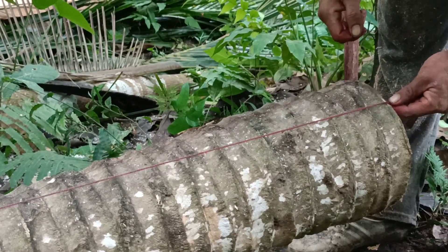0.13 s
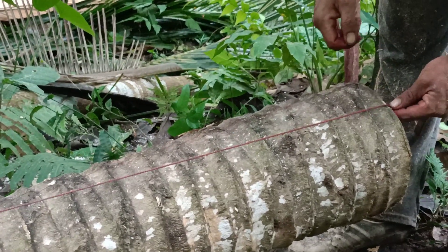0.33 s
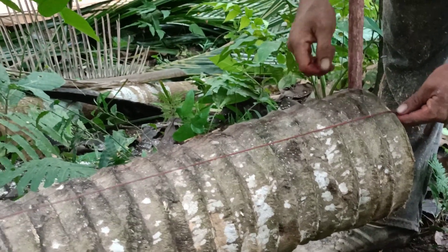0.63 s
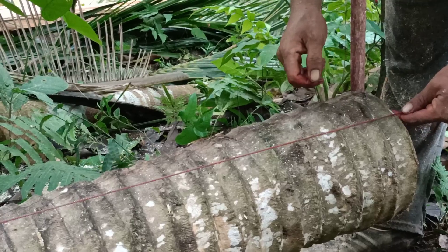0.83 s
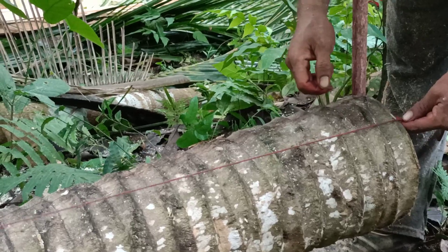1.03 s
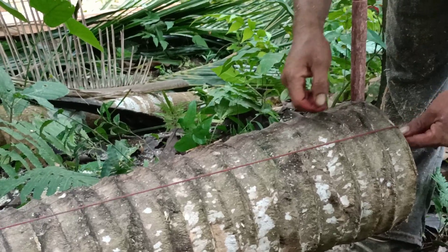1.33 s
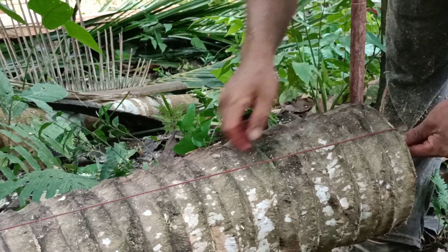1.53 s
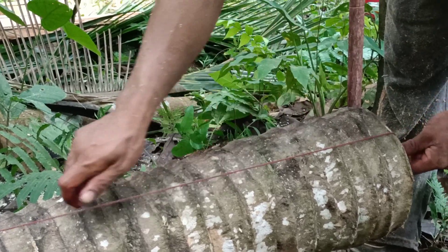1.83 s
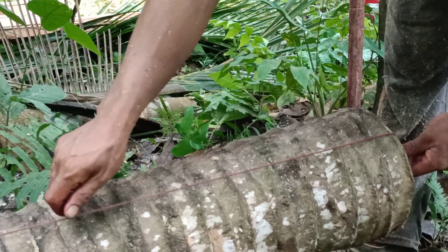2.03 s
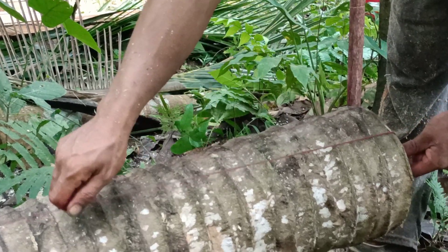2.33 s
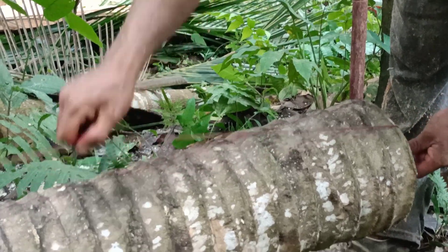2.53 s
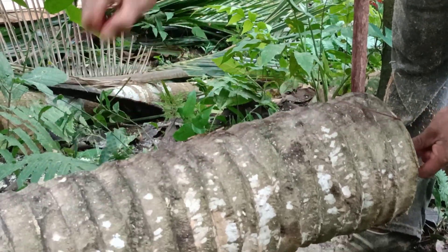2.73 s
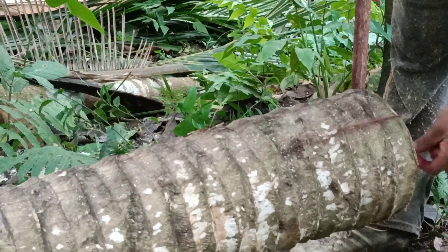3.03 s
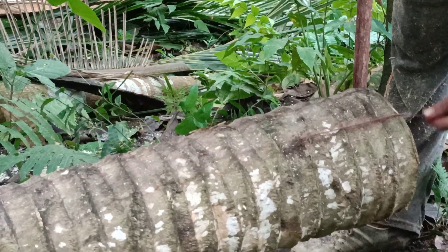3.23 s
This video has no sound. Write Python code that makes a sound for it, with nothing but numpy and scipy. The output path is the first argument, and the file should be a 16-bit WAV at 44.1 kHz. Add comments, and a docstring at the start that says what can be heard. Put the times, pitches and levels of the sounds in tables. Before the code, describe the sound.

A taut string snaps hard against a palm log near the microphone after three seconds of faint sleeve rustle and gritty scuffs; the crack scatters in foliage while the line bounces duller, over quiet outdoor air.

```python
"""Outdoors among plants, a chalk line is lifted and snapped once against a palm log, near the microphone.
A quiet rumble and two-banded hiss run throughout, shaped from noise; sleeve rustle, gritty scuffs and a soft
low bump come first, as swelling noise and grains. The string slips from the fingers with a squeak and slaps the
bark in dense rushes of tiny contacts; decaying sines make its hum, its ringing and the low push on the log.
It bounces back a few times, ever duller, while noise tails scatter the sound as foliage does."""
import sys
import numpy as np
from scipy import signal
from scipy.fft import rfft, irfft
from scipy.io import wavfile
from scipy.ndimage import uniform_filter1d

SR = 44100
rng = np.random.default_rng(int(sys.argv[2]) if len(sys.argv) > 2 else 0)


def pcm_store(signal):
    """Save signal as 16-bit PCM."""
    levels = np.round(np.clip(np.atleast_2d(signal), -1, 1) * 32767)
    wavfile.write(sys.argv[1], SR, levels.astype(np.int16).T)


N = 149940  # samples, 3.4 s


def amp(db):
    """Decibels to gain."""
    return 10 ** (np.asarray(db) / 20)


def unit(x):
    """Scales to rms 1."""
    return x / np.sqrt(np.mean(x ** 2) + 1e-20)


def read(points, hz):
    """Reads a table on a log-frequency axis."""
    f, value = np.transpose(points)
    return np.interp(np.log(hz + 1), np.log(f + 1), value)


def bins():
    """Frequencies of the full-length spectrum, in Hz."""
    return np.fft.rfftfreq(N, 1 / SR)


def since(start):
    """Seconds since start, zero before it."""
    return np.maximum(np.arange(N) / SR - start, 0)


def burst(start, rise, decay):
    """Linear rise, then exponential decay."""
    t = since(start)
    return np.minimum(t / rise, 1) * np.exp(-np.maximum(t - rise, 0) / decay)


def hill(hz, octaves):
    """A bell curve over log frequency."""
    return np.exp(-.5 * (np.log2((bins() + 1) / hz) / octaves) ** 2)


def colour(x, db):
    """Causal filter of unit power; the dB per bin set only its shape."""
    # Folding the cepstrum forward in time gives minimum phase
    cepstrum = irfft(np.log(unit(amp(db)) + 1e-6), N)
    cepstrum[1:N // 2] *= 2
    cepstrum[N // 2 + 1:] = 0
    return irfft(rfft(x) * np.exp(rfft(cepstrum)), N)


def pair(x, likeness):
    """Blends two unrelated channels to a given likeness per frequency."""
    angle = np.arcsin(np.clip(read(likeness, bins()), -1, 1)) / 2
    z = rfft(x)
    return irfft(np.cos(angle) * z + np.sin(angle) * z[::-1], N)


def grains(per_s, spread_db):
    """Dense tiny contacts, uneven when spread_db is above 0, in two channels of rms 1."""
    size = amp(spread_db * np.minimum(rng.exponential(1, (2, N)), 3))
    sign = rng.choice([-1, 1], (2, N))
    present = rng.random((2, N)) < per_s / SR
    return unit(size * sign * present)


def waver(rate_hz):
    """A slow random wobble of rms 1."""
    spectrum = rfft(rng.standard_normal(N)) * np.exp(-(bins() / rate_hz) ** 2)
    return unit(irfft(spectrum, N))


# Colour of the outdoor air: (frequency [Hz], relative level [dB per Hz])
AIR_COLOUR = [(12, -39), (20, -15.5), (59, -2.5), (97, -7.5), (175, -8.5), (237, -16.5), (280, -13),
              (322, -21), (425, -17.5), (627, -21.5), (681, -25.5), (1400, -33), (2970, -29.5), (6290, -34),
              (7850, -20.5), (8780, -35.5), (10700, -20), (12300, -39), (15300, -34.5)]
# How alike left and right are in the air and the cloth: (frequency [Hz], likeness [0-1])
AIR_LIKENESS = [(30, 0.27), (90, 0.76), (250, 0.85), (700, 0.35), (2000, 0.1), (10000, 0.051)]
AIR_DB, AIR_PATCHY_DB = -61, 1.27  # overall level, rms unevenness


def air():
    """Low outdoor rumble and a thin hiss with two high bands, gently patchy in time and frequency."""
    noise = pair(rng.standard_normal((2, N)), AIR_LIKENESS)
    z = signal.stft(noise, nperseg=1024)[2]
    patches = uniform_filter1d(rng.standard_normal(z.shape[1:]), size=14, axis=0)
    patches = unit(uniform_filter1d(patches, size=8, axis=1))
    patchy = signal.istft(z * amp(AIR_PATCHY_DB * patches), nperseg=1024)[1][:, :N]
    return amp(AIR_DB) * unit(colour(patchy, read(AIR_COLOUR, bins())))


# Sleeve and arm moving: (middle [s], half length to 1/e [s], level [dB])
SLEEVE_SWISHES = [(0.326, 0.23, -64), (.68, 0.042, -67), (1.522, .17, -64.5), (1.848, 0.2, -66),
                  (2.513, 0.18, -72.5)]
# Colour of the cloth: (frequency [Hz], relative level [dB])
CLOTH_COLOUR = [(60, -31), (180, -3.5), (300, 5.5), (600, -4.5), (1100, -12.5), (2500, -20), (12000, -24)]


def movement():
    """Cloth swishes as the arm reaches out: coloured noise in bell-shaped swells."""
    t = since(0)
    noise = pair(rng.standard_normal((2, N)), AIR_LIKENESS)
    speed = sum(amp(db) * np.exp(-((t - s) / half) ** 2) for s, half, db in SLEEVE_SWISHES)
    return speed * colour(noise, read(CLOTH_COLOUR, bins()))


# Fingers and line scuffing the bark:
# (start [s], level [dB], rise [s], decay [s], brightest frequency [Hz], its lift [dB])
BARK_SCUFFS = [(0.526, -58.5, 0.013, 0.05, 3280, 4), (.652, -55.5, 0.015, 0.011, 5170, 14),
               (0.683, -54, .003, 0.011, 5400, 6), (0.6971, -45.5, 0.00073, 0.0034, 5570, 9.5),
               (0.9, -57, 0.008, 0.018, 5830, 3), (.931, -64.5, .003, 0.018, 6000, 5),
               (.99, -58.5, .007, 0.026, 9400, 8), (1.714, -55.5, 0.0022, .008, 5340, 11),
               (1.805, -63.5, .005, 0.021, 6000, 9), (1.846, -65, 0.0036, 0.0099, 4600, 15),
               (2.54, -68, 0.02, 0.065, 4080, 7)]
# Shared colour of the scuffs: (frequency [Hz], relative level [dB])
SCUFF_TINT = [(100, -1), (600, -1), (1400, -7), (3000, 1), (11000, 0.5), (15000, -6)]
# How alike left and right are for sounds near the microphone: (frequency [Hz], likeness [0-1])
NEAR_LIKENESS = [(100, 0.6), (1200, 0.33), (2600, 0), (8000, 0.24)]
SCUFF_GRAINS_PER_S, SCUFF_SPREAD_DB, SCUFF_OCTAVES = 3000, 3.5, 0.19


def scuffs():
    """Small gritty rubs of fingers and line: grains with a bright band of their own for each rub."""
    grit = pair(grains(SCUFF_GRAINS_PER_S, SCUFF_SPREAD_DB), NEAR_LIKENESS)
    out = np.zeros((2, N))
    for s, db, rise, decay, hz, lift_db in BARK_SCUFFS:
        rub = grit * amp(db) * burst(s, rise, decay)
        out += colour(rub, read(SCUFF_TINT, bins()) + lift_db * hill(hz, SCUFF_OCTAVES))
    return out


# Early scatter, how fast each band dies: (frequency [Hz], t60 [s])
EARLY_DECAY = [(300, 0.47), (1200, 0.4), (3000, .23), (5000, 0.26), (9000, .27), (15000, 0.23)]
EARLY_DB = -6.5
# Late scatter, how fast each band dies: (frequency [Hz], t60 [s])
LATE_DECAY = [(300, .9), (4000, 0.94), (15000, 0.65)]
# Late scatter, gain of each band: (frequency [Hz], gain [dB])
LATE_TINT = [(300, -25), (1500, -20), (3000, -29.5), (5500, -18.5), (14000, -30)]


def scatter(t60, tint=None, onset_s=0.0093):
    """A diffuse one-second tail, each band dying at its own speed; unit energy before any tint."""
    hz, t, z = signal.stft(rng.standard_normal((2, SR)), SR, nperseg=256)
    fading = z * amp(-60 * t / read(t60, hz)[:, None])
    tail = signal.istft(fading, SR, nperseg=256)[1][:, :SR]
    tail = tail * np.minimum(np.arange(SR) / SR / onset_s, 1)
    tail = unit(tail) / np.sqrt(SR)
    if tint is None:
        return tail
    gain = amp(read(tint, np.fft.rfftfreq(SR, 1 / SR)))
    return irfft(rfft(tail) * gain, SR)


def grove(x):
    """Undergrowth scatters the sound; farther trees add a faint longer tail."""
    response = amp(EARLY_DB) * scatter(EARLY_DECAY) + scatter(LATE_DECAY, LATE_TINT)
    return signal.fftconvolve(x, response, axes=1)[:, :N]


BUMP_START_S, BUMP_LENGTH_S = .895, .1
BUMP_DB, BUMP_HZ, BUMP_OCTAVES = -55, 83, 0.36


def bump():
    """One soft swell of low narrow noise, perhaps a shift of weight on the ground."""
    low = unit(irfft(rfft(rng.standard_normal(N)) * hill(BUMP_HZ, BUMP_OCTAVES), N))
    progress = np.minimum(since(BUMP_START_S) / BUMP_LENGTH_S, 1)
    swell = np.sqrt(abs(np.sin(np.pi * progress)))
    return amp(BUMP_DB) * swell * low


# String meeting the bark: (start [s], level [dB], rise [s], decay [s])
BARK_SLAPS = [(2.9848, -31.5, 0.0039, 0.0053), (2.9941, -13.5, 0.00018, 0.0014),
              (2.9956, -8, 0.0028, 0.0034), (3.0042, -13, 0.0012, 0.0046), (3.0075, -13, 0.00042, 0.0093),
              (3.0163, -17.5, 0.0014, 0.0084)]
# Colour of the crack: (frequency [Hz], relative level [dB])
CRACK_COLOUR = [(60, -20.5), (300, -25), (550, -11.5), (850, -22), (1170, -17), (1700, -16.5),
                (2300, -13.5), (2870, -5), (3800, -10.5), (4500, -6), (7000, -3), (9000, 0.5), (12000, -5),
                (15300, -8)]
CONTACTS_PER_S, CONTACT_SPREAD_DB = 20000, 0


def crack():
    """The string lands on the rough bark in a few quick rushes of contacts, their powers added."""
    power = sum((amp(db) * burst(s, rise, decay)) ** 2 for s, db, rise, decay in BARK_SLAPS)
    contacts = pair(grains(CONTACTS_PER_S, CONTACT_SPREAD_DB), NEAR_LIKENESS)
    return colour(np.sqrt(power) * contacts, read(CRACK_COLOUR, bins()))


ZIP_S, ZIP_DB, ZIP_RISE_S, ZIP_DECAY_S, ZIP_HZ, ZIP_OCTAVES = 2.987, -26.5, .012, .004, 2880, 0.13


def slip():
    """A brief narrow squeak of the cord over the skin as it slips from the fingertips."""
    contacts = pair(grains(CONTACTS_PER_S, CONTACT_SPREAD_DB), NEAR_LIKENESS)
    narrow_db = 20 * np.log10(hill(ZIP_HZ, ZIP_OCTAVES) + 0.0093)  # a faint floor outside the band
    rub = colour(contacts, narrow_db)
    return amp(ZIP_DB) * burst(ZIP_S, ZIP_RISE_S, ZIP_DECAY_S) * rub


# Close reflections from the log and the ground: (delay [s], left gain [ratio], right gain [ratio])
NEAR_REFLECTIONS = [(.0023, 0.16, -0.23), (.0051, -0.23, 0.3), (.0098, .3, .2)]


def reflections(x):
    """The log and the ground return a few close copies."""
    out = np.zeros((2, N))
    for delay, left, right in NEAR_REFLECTIONS:
        out += np.array([[left], [right]]) * np.roll(x, round(delay * SR), axis=1)
    return out


# Partials of the taut string: (frequency [Hz], level above HUM_DB [dB], t60 before slackening [s])
STRING_PARTIALS = [(301, -7, 1), (378, -10, 1), (402, -11, 1), (499.6, -3, 1), (604, -2.5, 0.37),
                   (700, -11, .3)]
# Ringing of the line and its anchor: (frequency [Hz], level [dB] before each blow's own, t60 [s])
ANCHOR_MODES = [(1144, -42, .17), (1179, -40, .12), (1272, -38, .13), (2040, -50.5, 0.15), (2929, -42, .11)]
# Each swing sets the line ringing again: (start [s], level added to the modes [dB], rise [s])
SWING_BLOWS = [(2.989, 2, 0.0038), (3.024, 8.5, 0.018), (3.058, -0.5, 0.014), (3.126, -9, .015),
               (3.176, -21, .01), (3.247, -15, 0.011), (3.32, -20, 0.015)]
RELEASE_S, HUM_RISE_S, HUM_DB = 2.989, 0.0075, -43.5
WAVER_SHARE, WAVER_HZ = .006, 22  # rms share of pitch, speed of the wobble
SLACK_AFTER_S, SLACK_FADE_S = .17, 0.093  # counted from release, then 1/e fade


def ring(start, rise, hz, db, t60, clock):
    """One dying mode, with its own phase on each side; the clock carries its wavering."""
    first = round(start * SR)
    t = np.arange(N - first) / SR
    phase = rng.random() + rng.random((2, 1)) / 2
    level = np.minimum(t / rise, 1) * amp(db - 60 * t / t60)
    tone = level * np.sin(2 * np.pi * (hz * clock[first:] + phase))
    return np.pad(tone, ((0, 0), (first, 0)))


def string():
    """The taut line hums, its tension wavering, until the hand slackens it; every swing rings it anew."""
    clock = np.cumsum(1 + WAVER_SHARE * waver(WAVER_HZ)) / SR
    taut = np.exp(-since(RELEASE_S + SLACK_AFTER_S) / SLACK_FADE_S)
    hum = sum(ring(RELEASE_S, HUM_RISE_S, hz, HUM_DB + db, t60, clock) for hz, db, t60 in STRING_PARTIALS)
    rings = np.zeros((2, N))
    for s, blow_db, rise in SWING_BLOWS:
        for hz, db, t60 in ANCHOR_MODES:
            rings += ring(s, rise, hz, blow_db + db, t60, clock)
    return taut * hum + rings


# Low push of the blow on the log: (start [s], frequency [Hz], level [dB], decay [s])
LOG_THUMPS = [(2.99, 111, -37, 0.0095), (3.001, 31.1, -42.5, 0.036)]


def log_thump():
    """The heavy log gives only a short low push, as quickly dying sines alike on both sides."""
    out = np.zeros(N)
    for s, hz, db, decay in LOG_THUMPS:
        t = since(s)
        out += amp(db) * np.exp(-t / decay) * np.sin(2 * np.pi * hz * t)
    return out


# The slackening line bounces on the bark: (peak [s], brush level [dB], swell [s], decay [s],
# tick level [dB], left over right [dB], treble edge [Hz])
LINE_BOUNCES = [(3.063, -27.5, 0.017, 0.017, -24, -4.5, 14000), (3.118, -42, 0.0066, 0.021, -52, 0, 10000),
                (3.180, -44.5, .001, 0.019, -39.5, -2, 8000), (3.2558, -46, 0.0089, .007, -44, -0.5, 6000),
                (3.293, -61.5, 0.0059, 0.01, -60, -6, 5000), (3.327, -55.5, 0.01, 0.0067, -79, 1, 3530)]
TICK_S, BOUNCE_BODY_DB, BOUNCE_BODY_HZ = 0.0013, -3, 2920


def bounces():
    """Each return of the line brushes the bark and ticks, thinner than the crack and duller as it slackens."""
    t, out = since(0), np.zeros((2, N))
    contacts = pair(grains(CONTACTS_PER_S, CONTACT_SPREAD_DB), NEAR_LIKENESS)
    tone = read(CRACK_COLOUR, bins()) + BOUNCE_BODY_DB * hill(BOUNCE_BODY_HZ, octaves=0.33)
    for s, db, swell, decay, tick_db, pan_db, edge_hz in LINE_BOUNCES:
        brush = amp(db) * np.exp(-abs(t - s) / np.where(t < s, swell, decay))
        tick = amp(tick_db) * np.exp(-((t - s) / TICK_S) ** 2)
        dull = 10 * np.log10(1 + (bins() / edge_hz) ** 2)  # treble loss in dB
        sides = amp(np.array([[pan_db], [-pan_db]]) / 2)
        out += sides * colour(np.hypot(brush, tick) * contacts, tone - dull)
    return out


# Share of the small sounds that reaches the undergrowth
SCUFF_WET_DB, BOUNCE_WET_DB = -2, -3


def scene():
    """All near sounds, their scatter and the background."""
    rubs = scuffs()
    snap = crack() + slip()
    returns = bounces()
    tail = grove(snap + amp(BOUNCE_WET_DB) * returns + amp(SCUFF_WET_DB) * rubs)
    near = rubs + snap + reflections(snap) + returns
    return air() + movement() + bump() + near + tail + string() + log_thump()


def record(dry):
    """The recorder's band limit: a steep low-pass at 15600 Hz."""
    low_pass = signal.firwin(301, 15600, window=("kaiser", 8), fs=SR)
    return signal.oaconvolve(dry, low_pass[None], "same")


dry = scene()
out = record(dry)
pcm_store(out)
```